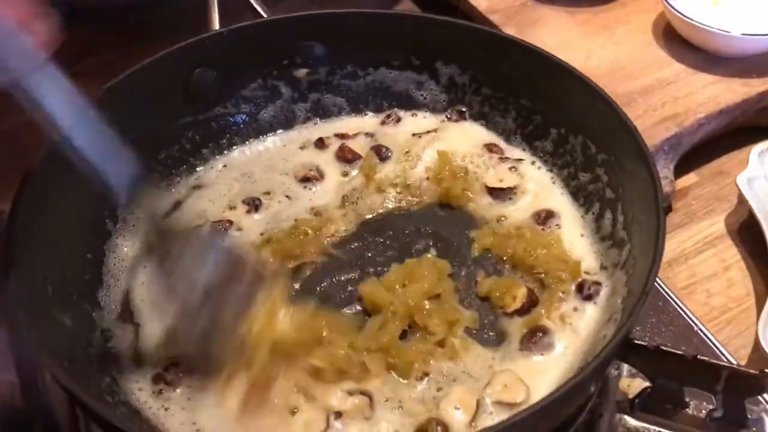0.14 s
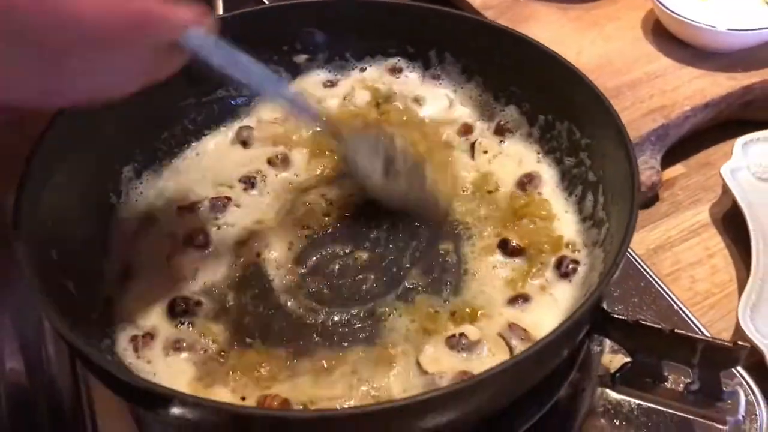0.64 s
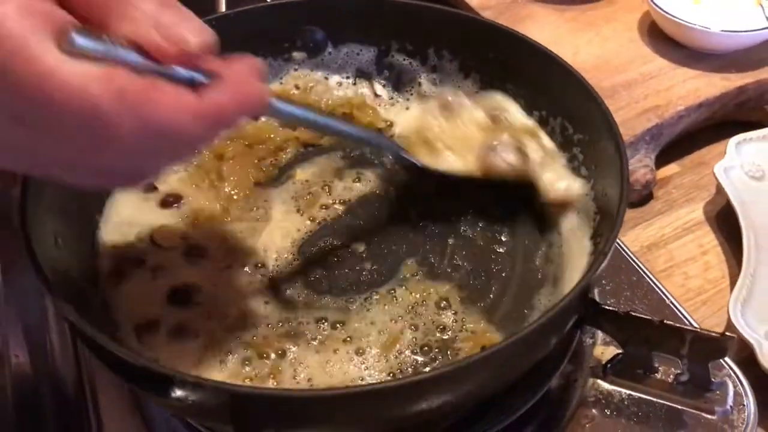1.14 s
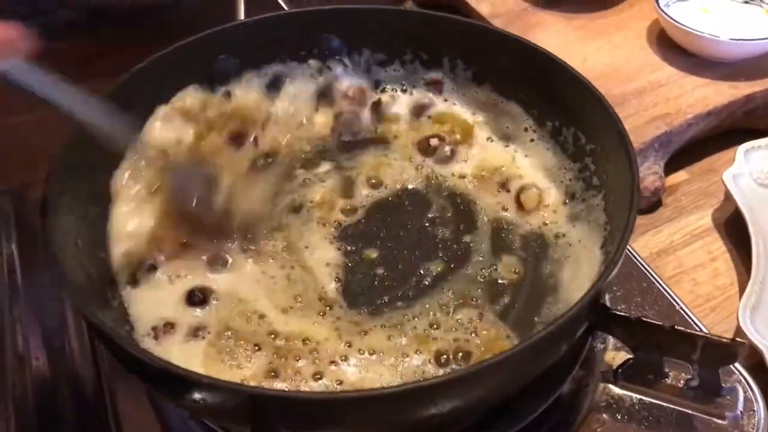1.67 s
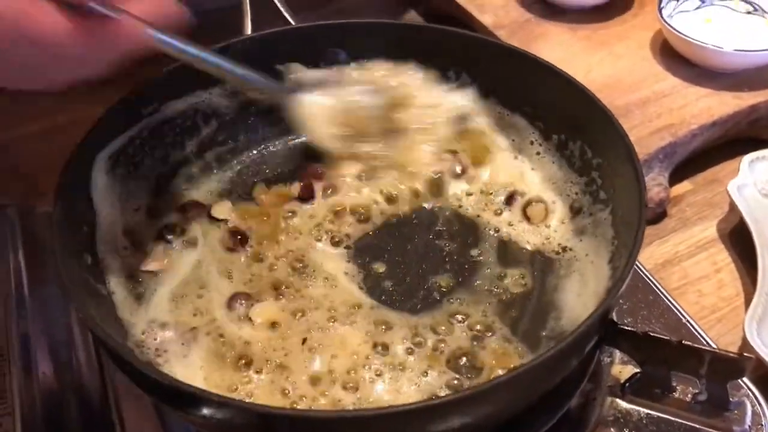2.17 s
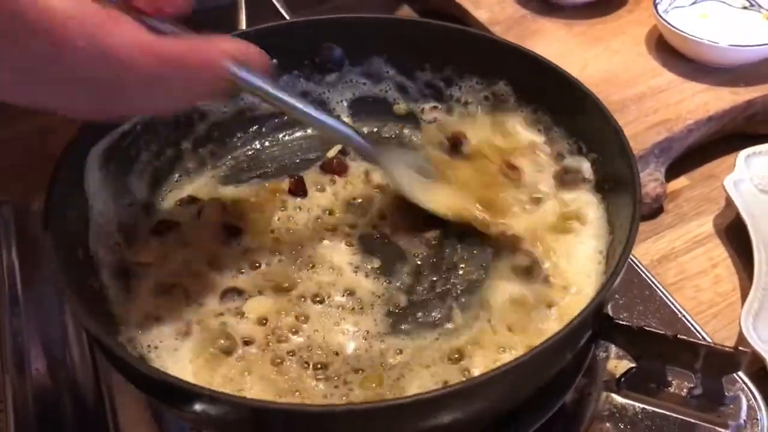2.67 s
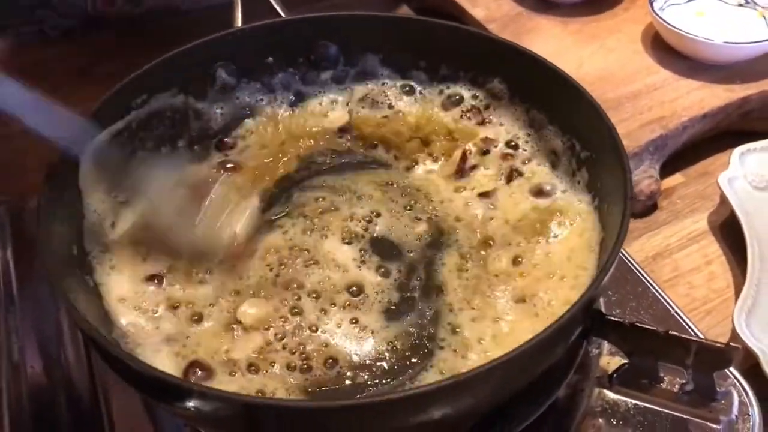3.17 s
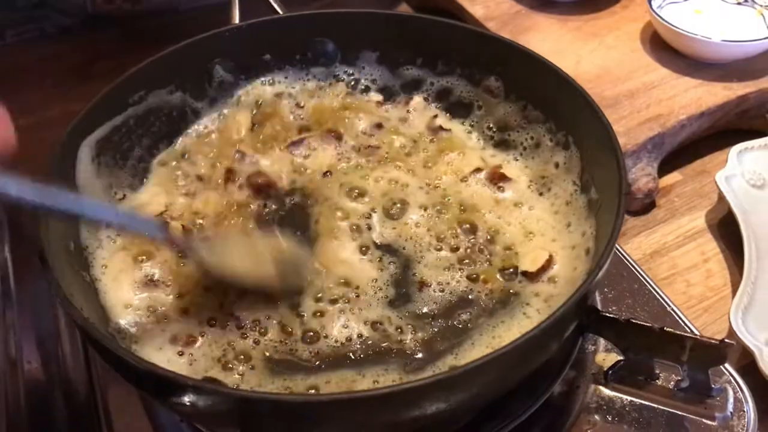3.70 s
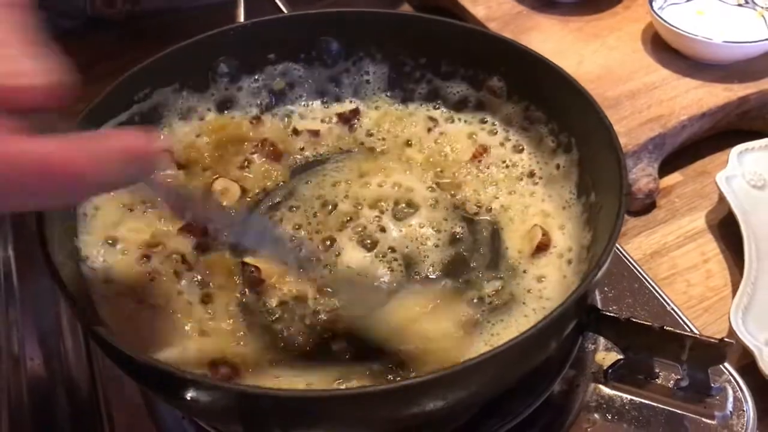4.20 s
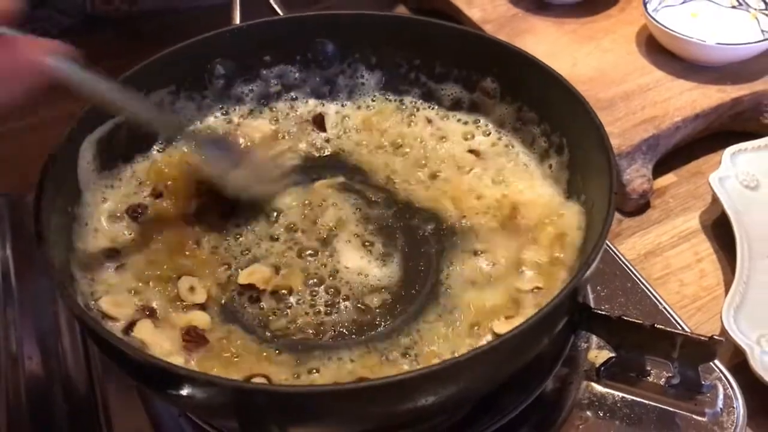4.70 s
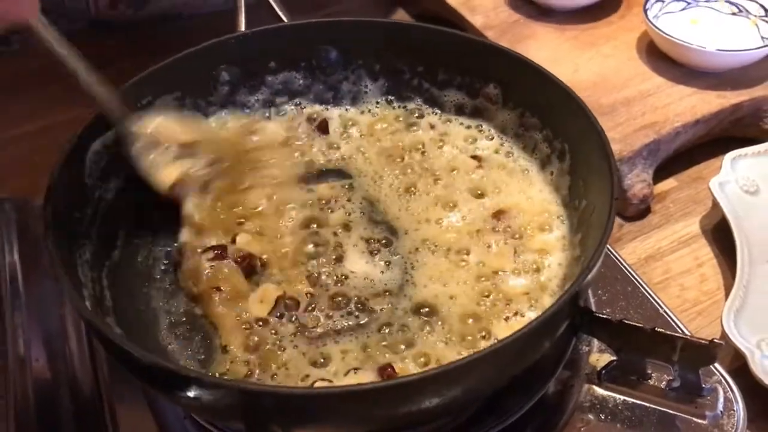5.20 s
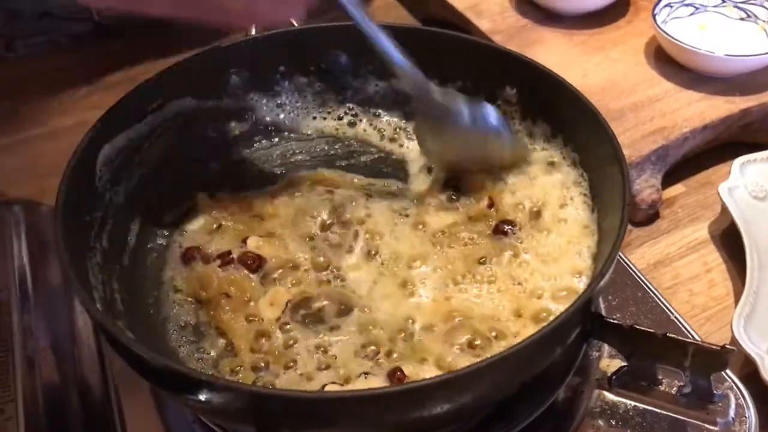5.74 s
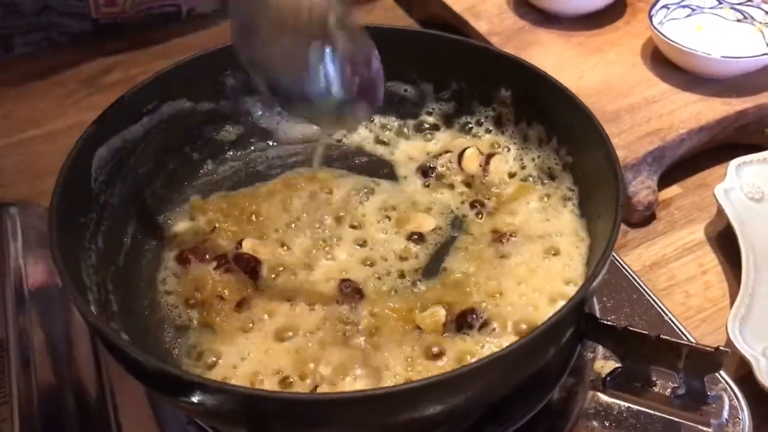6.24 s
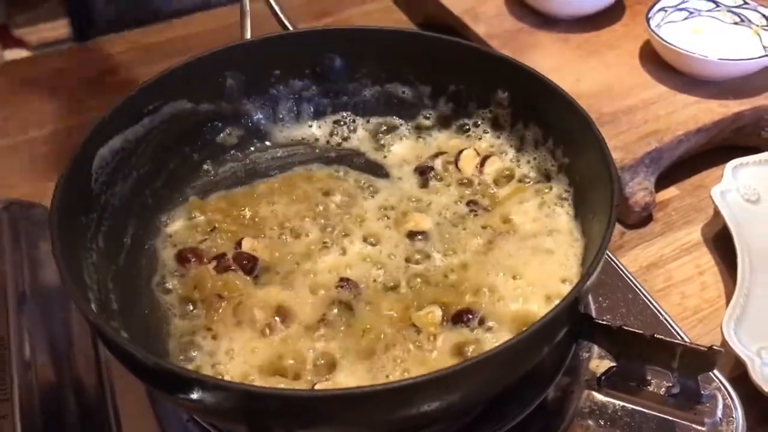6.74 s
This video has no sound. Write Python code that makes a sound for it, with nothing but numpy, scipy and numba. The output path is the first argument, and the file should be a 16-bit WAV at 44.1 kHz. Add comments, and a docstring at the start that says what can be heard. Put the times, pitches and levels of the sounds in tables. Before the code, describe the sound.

A metal spoon scrapes and knocks around a frying pan of fizzing, spitting butter, then stops, leaving the sizzle to weaken in a kitchen.

```python
"""A spoon drags, scrapes and knocks in a pan of foaming butter: friction grains and blows drive the pan's modes.
From the start bursting bubbles fizz as banded noise puffs over hiss; small bubbles ring; the pan rocks on the hob.
From 0.8 s louder spits, short rings with spray, join in; the deepest knock thuds at 5 s and stirring ends at 5.4 s.
After a last short scrape at 5.8 s the pan settles in soft low bumps at 6.4 s, and the fizz weakens.
Throughout: a low hum of shaped noise, a short room tail, and brief dropouts that keep only the strongest tones."""
import sys
import numpy as np
from scipy import signal
from scipy.fft import rfft, irfft
from scipy.io import wavfile
from scipy.ndimage import uniform_filter1d
from numba import njit

SR = 44100
rng = np.random.default_rng(int(sys.argv[2]) if len(sys.argv) > 2 else 0)


def attenuation_scalar(level_db):
    """Turn a level in dB into a linear amplitude multiplier (20 dB per decade)."""
    decades = np.asarray(level_db, float) / 20
    return 10 ** decades


def unload_audio(sound):
    """Save the sound as a 16-bit wav file, at the path given as the first command line argument."""
    columns = np.transpose(np.atleast_2d(sound))
    # keep every value between -1 and 1, then stretch to whole-number steps
    steps = np.round(np.clip(columns, -1, 1) * 32767)
    wavfile.write(sys.argv[1], SR, steps.astype(np.int16))


N = 302967


def rms_one(x):
    """Scales to rms 1."""
    return x / np.sqrt(np.mean(x ** 2) + 1e-20)


def in_time(rows):
    """Joins rows (time_s, values) by straight lines, one array a column."""
    time_s, *columns = np.transpose(rows)
    return [np.interp(np.arange(N) / SR, time_s, column) for column in columns]


def coloured(x, points):
    """Filters x by a spectrum (freq_hz, level_db), straight over log frequency."""
    hz, level_db = np.transpose(points)
    grid_hz = np.arange(N // 2 + 1) * SR / N + 1
    return irfft(rfft(x) * attenuation_scalar(np.interp(np.log(grid_hz), np.log(hz), level_db)), N)


def cut(x, hz, kind, order=4):
    """Butterworth high-, low- or band-pass."""
    return signal.sosfilt(signal.butter(order, hz, kind, fs=SR, output="sos"), x)


def drift(rate_hz):
    """Slow chance of rms 1, changing about rate_hz times a second; drawn at every 32nd sample."""
    r = np.exp(-64 * np.pi * rate_hz / SR)
    noise = rng.standard_normal(N // 32 + 2002)
    slow = signal.lfilter([1], [1, -2 * r, r * r], noise)[2000:]
    return np.interp(np.arange(N) / 32, np.arange(len(slow)), rms_one(slow))


def grains(per_s, spread_db):
    """Random clicks of either sign; most are small, a few large."""
    sizes = attenuation_scalar(spread_db * np.minimum(rng.exponential(1, N), 4.3)) * rng.choice([-1, 1], N)
    return sizes * (rng.random(N) < per_s / SR)


def ring(clicks, hz, t60_s):
    """A fixed two-pole resonance: a unit click starts a decaying sine of height 1."""
    r, turn = attenuation_scalar(-60 / (t60_s * SR)), 2 * np.pi * hz / SR
    return signal.lfilter([0, np.sin(turn)], [1, -2 * r * np.cos(turn), r * r], clicks + 1e-18)


@njit
def glide(x, turn, r):
    """A two-pole resonance of pole radius r whose centre (radians a sample) moves."""
    y = np.zeros(len(x))
    for i in range(2, len(x)):
        y[i] = x[i] - x[i - 2] + 2 * r * np.cos(turn[i]) * y[i - 1] - r * r * y[i - 2]
    return y


def strokes(rows, rest_db):
    """Summed level_db of domed strokes (start_s, length_s, level_db), and a blend of values by stroke power."""
    rise_db_per_s, fall_db_per_s, dome_db = 800, 334, 3.5   # slopes before and after; sag of the ends
    lift_s = 5.42   # stirring ends: no more resting contact
    t, fine = np.arange(0, N / SR + .002, .001), np.arange(N) / SR
    start, length, level_db = np.array(rows)[:, :3, None].transpose(1, 0, 2)
    along = np.clip((t - start) / np.maximum(length, .005), 0, 1)
    shape_db = -dome_db * (2 * along - 1) ** 2
    shape_db = shape_db - rise_db_per_s * np.maximum(start - t, 0)
    shape_db = shape_db - fall_db_per_s * np.maximum(t - start - length, 0)
    power = attenuation_scalar(2 * np.maximum(level_db + shape_db, -300))
    rest = attenuation_scalar(2 * rest_db) * (t < lift_s)
    total_db = 10 * np.log10(power.sum(axis=0) + rest + 1e-12)

    def blend(first, last):
        """Values run from first to last along each stroke."""
        values = first[:, None] * (1 - along) + last[:, None] * along
        return np.interp(fine, t, np.sum(power * values, axis=0) / power.sum(axis=0))

    return np.interp(fine, t, total_db), blend


# foam: time_s, level_db, bright_db (treble up, bass down)
FOAM_COURSE = [(0.0, -32.5, 8.5), (1.09, -29, 5.5), (1.2, -31, 4.5), (1.78, -32, 6), (2.2, -31, 3),
               (2.45, -31.5, 1), (3.27, -30, 6), (3.62, -32, 0.5), (4.21, -32.5, 4.5), (5.93, -34, 2.5),
               (6.39, -34, 1), (6.87, -37, 0.5)]
# fizz spectrum: freq_hz, density_db (per Hz)
FIZZ_SPECTRUM = [(260, -46), (450, -25.5), (654, -8.5), (794, -11.5), (882, -10.5), (993, -9), (1220, -11),
                 (1750, -6.5), (1920, -10), (2870, -7.5), (3810, -7), (4360, -6), (4910, -6), (8540, -4),
                 (16000, -11)]


def fizz():
    """Clumped bubble bursts, each a millisecond noise puff in neighbouring bands, over a smooth steam hiss."""
    bursts = np.abs(grains(2000 * attenuation_scalar(2.5 * drift(25)), 4.4))
    edges_hz, dealt = np.geomspace(600, 17000, 9), rng.integers(0, 8, N)
    crackle = 0
    for k, (low_hz, high_hz) in enumerate(zip(edges_hz, edges_hz[1:])):
        fade = np.exp(-np.sqrt(low_hz) / (.042 * SR))   # small bubbles die faster
        in_band = np.abs(dealt - k) < 1.5   # a burst spills into the next bands
        puffs = signal.lfilter([1], [1, -fade], bursts * in_band)
        crackle = crackle + cut(rms_one(puffs * rng.standard_normal(N)), [low_hz, high_hz], "band", order=1)
    hiss = rng.standard_normal(N) * attenuation_scalar(1.7 * drift(6.2))
    level_db, bright_db = in_time(FOAM_COURSE)
    foam = rms_one(coloured(rms_one(crackle) + attenuation_scalar(2.37) * hiss, FIZZ_SPECTRUM))
    low, top = cut(foam, 1130, "low", order=2), cut(foam, 8470, "high", order=2)
    # hotter foam tips the balance from large bubbles to small
    return attenuation_scalar(level_db) * (foam + (attenuation_scalar(-bright_db) - 1) * low + (attenuation_scalar(bright_db) - 1) * top)


# spits: start_s, level_db, pitch_hz
SPIT_BURSTS = [(0.803, -17, 3100), (0.9865, -17, 2880), (1.261, -19, 4020), (1.536, -12, 3530),
               (1.611, -18.5, 2940), (1.63, -28, 9000), (1.737, -8, 9700), (1.971, -14, 6000),
               (1.9789, 0, 11500), (1.981, -12, 5000), (2.273, -16.5, 3480), (2.363, -17, 5060),
               (2.4353, -2.5, 5270), (2.4804, -12, 9200), (2.6175, -10, 3720), (2.623, -17, 3500),
               (2.676, -12, 4000), (2.6771, -26, 3220), (2.7776, -13, 3050), (2.888, -11.5, 4020),
               (3.557, -32, 4000), (3.578, -19, 3000), (3.6737, -19, 4660), (3.7814, -14.5, 5360),
               (3.8363, -10.5, 4600), (3.918, -21, 3600), (4.318, -7, 4500), (4.363, -16, 4000),
               (4.6822, -18, 6630), (4.867, -8.5, 8500), (4.8956, -16, 4200), (4.959, -23, 3000),
               (4.983, -15.5, 2940), (4.9868, -18, 3030), (5.0055, -18, 2000), (5.2642, -9, 3500),
               (5.383, -20, 6460), (5.578, -18, 8000), (5.587, -17, 7000), (5.592, -21, 2300),
               (5.6094, -11, 9100), (5.617, -28, 6350), (5.639, -20, 9210), (5.662, -16, 9370),
               (5.785, -17, 4000), (5.883, -22, 4000), (5.902, -23, 2600), (5.922, -22, 6000),
               (6.053, -14, 4630), (6.055, -22, 3500), (6.09, -28, 5000), (6.1977, -8.5, 7200),
               (6.229, -19, 7450), (6.288, -17.5, 6140), (6.303, -7, 8900), (6.4513, -9.5, 8550),
               (6.684, -14, 5100), (6.7765, -15.5, 7800)]


def spits():
    """A big bubble bursts: a ring dying within a few cycles and a millisecond of spray."""
    out, t = np.zeros(N + 400), np.arange(400) / SR
    spray = rng.standard_normal((len(SPIT_BURSTS), 400))
    for (start_s, level_db, hz), noise in zip(SPIT_BURSTS, spray):
        pop = 1.38 * np.sin(2 * np.pi * hz * t) * np.exp(-t * hz)
        tail = cut(0.33 * noise * np.exp(-t / 0.0013), 0.17 * hz, "high", order=1)
        out[round(start_s * SR):][:400] += attenuation_scalar(level_db) * (pop + tail)
    return cut(out[:N], 640, "high", order=2)


def pops():
    """Scattered small bubbles ring a few cycles each, at pitches spread over two octaves."""
    pops_per_s, re_foam_db, t60_cycles = 190, -14.0, 9.1
    born = grains(pops_per_s * attenuation_scalar(3.0 * drift(8.0)), 2.5)
    dealt = rng.integers(0, 16, N)
    rings = 0
    for k, hz in enumerate(np.geomspace(2000, 8000, 16)):
        rings = rings + ring(born * (dealt == k), hz, t60_cycles / hz)
    return attenuation_scalar(in_time(FOAM_COURSE)[0] + re_foam_db) * rms_one(cut(rings, 1390, "high", order=4))


# spoon bowl on the pan floor: start_s, length_s, level_db, first_hz, last_hz (favoured pitch)
BOWL_DRAGS = [(0.0, 0.11, -25, 798, 883), (0.382, 0.11, -29, 980, 880), (0.515, 0.19, -28, 800, 940),
              (0.674, 0.12, -34.5, 880, 1060), (0.937, 0.16, -33.5, 810, 790), (1.114, 0.15, -42, 800, 940),
              (1.352, 0.026, -28, 880, 880), (1.439, 0.09, -27, 880, 947), (1.595, 0.025, -26.5, 920, 895),
              (1.895, 0.13, -38.5, 600, 655), (2.027, 0.16, -31, 706, 690), (2.176, 0.041, -39, 756, 880),
              (2.59, 0.052, -33.5, 910, 850), (2.71, 0.16, -34.5, 930, 950), (2.811, 0.051, -29, 960, 780),
              (2.928, 0.038, -26.5, 790, 734), (3.006, 0.17, -39, 1060, 1045),
              (3.144, 0.16, -35.5, 900, 856), (3.423, 0.089, -27.5, 750, 724),
              (3.584, 0.024, -39, 1010, 1030), (3.711, 0.058, -31.5, 900, 805),
              (3.944, 0.028, -27.5, 750, 880), (4.051, 0.078, -28.5, 1000, 840),
              (4.164, 0.082, -30, 1050, 880), (4.317, 0.039, -36.5, 1060, 1010),
              (4.34, 0.25, -35.5, 880, 850), (4.553, 0.077, -36, 880, 879), (4.606, 0.083, -34, 970, 1030),
              (4.717, 0.056, -36.5, 830, 840), (5.052, 0.043, -25, 635, 628), (5.142, 0.13, -33, 790, 770),
              (5.181, 0.068, -28, 683, 630), (5.306, 0.033, -25, 880, 935)]


def drags():
    """The dragging bowl: floor contact level_db and the shaking pitch_hz it favours."""
    rest_db, wander_share = -67, 0.026
    first_hz, last_hz = np.array(BOWL_DRAGS)[:, 3:].T
    floor_db, blend = strokes(BOWL_DRAGS, rest_db)
    return floor_db, blend(first_hz, last_hz) * (1 + wander_share * drift(46.0))


# spoon edge on the pan: start_s, length_s, wall_db, wall_hz (favoured), rim_db (re wall)
EDGE_SCRAPES = [(0.024, 0.093, -27.5, 2110, -2.5), (0.383, 0.086, -26.5, 2230, 1),
                (0.445, 0.048, -35, 1640, -12), (0.555, 0.19, -31.5, 1836, -6.5),
                (0.757, 0.036, -35, 2460, 9.5), (0.98, 0.087, -32.5, 1680, -20),
                (1.039, 0.06, -33, 1950, 6), (1.179, 0.023, -31.5, 1730, -4),
                (1.349, 0.026, -33.5, 1760, -21), (1.457, 0.062, -30.5, 1810, -6),
                (1.54, 0.046, -39, 1880, -12), (1.598, 0.02, -25, 1580, -24),
                (2.031, 0.072, -28.5, 1810, -11), (2.108, 0.094, -28, 1900, 1),
                (2.585, 0.056, -26, 1840, -4.5), (2.714, 0.11, -36, 1970, -2),
                (2.784, 0.044, -23.5, 1890, -8), (2.942, 0.067, -29, 2050, 2), (3.004, 0.02, -34, 1680, 1),
                (3.14, 0.11, -32, 1980, -1), (3.296, 0.11, -33.5, 2110, 0.5),
                (3.444, 0.042, -26.5, 1750, -4.5), (3.591, 0.017, -42.5, 2130, 6),
                (3.708, 0.091, -38, 1850, -12), (3.926, 0.011, -32, 2020, 3.5),
                (4.049, 0.018, -25.5, 2360, -5.5), (4.09, 0.02, -32, 1680, -12),
                (4.129, 0.021, -35, 1950, 3), (4.173, 0.08, -27.5, 2020, -4),
                (4.363, 0.018, -24.5, 2180, -3), (4.402, 0.063, -34, 1700, -4.5),
                (4.503, 0.03, -35.5, 1840, 1), (4.54, 0.08, -24.5, 1958, -6.5),
                (4.713, 0.059, -28, 1830, -1), (5.084, 0.12, -32, 1850, 2.5),
                (5.213, 0.11, -30, 2040, -1.5), (5.315, 0.03, -24, 2280, -7), (5.807, 0.015, -37, 2520, 0)]


def scrapes():
    """The scraping edge: wall and rim levels_db and favoured pitches_hz, which fall along a scrape and waver."""
    rest_wall_db, rest_rim_db = -76, -77
    sag_share, wander_share, rim_over_wall = 0.059, 0.062, 1.65
    middle_hz = np.array(EDGE_SCRAPES)[:, 3]
    wall_db, blend = strokes(EDGE_SCRAPES, rest_wall_db)
    wall_hz = blend(middle_hz * (1 + sag_share / 2), middle_hz * (1 - sag_share / 2))
    wall_hz = wall_hz * (1 + wander_share * drift(19.0))
    rim_rows = [(start_s, length_s, db + rim_db) for start_s, length_s, db, _, rim_db in EDGE_SCRAPES]
    rim_db, _ = strokes(rim_rows, rest_rim_db)
    return wall_db, wall_hz, rim_db, rim_over_wall * wall_hz


# pan rocking on the hob: start_s, length_s, level_db
HOB_ROCKS = [(0.0, 0.087, -40), (.38, 0.039, -49), (.97, 0.083, -49.5), (1.895, 0.036, -38.5),
             (2.16, 0.03, -41), (2.6, 0.043, -41.5), (2.94, .06, -50), (3.3, 0.17, -52), (3.44, 0.07, -39),
             (4.69, 0.041, -45), (5.028, 0.058, -36), (5.18, 0.034, -44.5), (5.3, 0.03, -33),
             (5.81, 0.016, -44), (6.39, 0.25, -55)]


def rocks():
    """Level_db of the pan rubbing on the hob as it rocks."""
    return strokes(HOB_ROCKS, -61.5)[0]


# spoon chatters down: delay_s (after the knock), share (of the blow)
REBOUNDS = [(.0017, 0.19), (.0062, 0.1), (.011, -.2)]
# knocks and rebounds: start_s, dull_db, floor_hz (favoured), bright_db,
# chatter (0-1, scales the mode strikes and the rebound ticks), thud_db
SPOON_KNOCKS = [(.969, -33, 900, -27, 0.7, -22), (1.638, -40, 625, -38, .5, -31),
                (1.8805, -20, 625, -24, 0.9, -20), (1.902, -32, 700, -31, 0.4, -21),
                (2.1563, -29, 1150, -15, 0.6, -10), (2.162, -25, 880, -36, 0.5, -20),
                (2.5855, -31.5, 920, -19, 0.76, -20), (2.936, -29, 850, -21, 0.64, -28),
                (4.044, -46, 1060, -36, .6, -25.5), (5.0165, -13.5, 630, -15, 0.5, -5.5),
                (5.298, -36, 1000, -6.5, 0.97, -21), (5.3017, -24, 880, -18, 0.56, -12.5),
                (5.3073, -26, 786, -17, 0.66, -16)]
KNOCK_S, DULL_DB, KNOCK_HZ, BRIGHT_DB, CHATTER, THUD_DB = np.transpose(SPOON_KNOCKS)
KNOCK_AT = np.round(KNOCK_S * SR).astype(int)


def strikes(k, share_db):
    """Clicks that strike mode k: each knock and its rebounds, with a chance level per knock."""
    blow = attenuation_scalar(share_db + 2.5 * rng.standard_normal(len(KNOCK_AT)))
    out = np.zeros(N)
    for delay_s, share in [(0.00068, 1)] + REBOUNDS:
        # neighbouring modes start in opposite sense
        out[KNOCK_AT + round(delay_s * SR)] = share * CHATTER * blow * (-1) ** k
    return out


def thuds():
    """The pan floor under the spoon gives a damped thud, 60 dB down after 11 cycles."""
    out, click = np.zeros(N), np.arange(2000) == 0
    for i, hz, thud_db in zip(KNOCK_AT, KNOCK_HZ, THUD_DB):
        out[i:i + 2000] += ring(attenuation_scalar(thud_db) * click, hz, 11 / hz)
    return out


def ticks():
    """The sharp contact of each knock: a click and a noise burst decaying in 2.5 ms."""
    tick = np.zeros(N)
    tick[KNOCK_AT] = attenuation_scalar(BRIGHT_DB + 3.5)
    for delay_s, share in REBOUNDS:
        tick[KNOCK_AT + round(delay_s * SR)] = np.abs(share) * CHATTER * tick[KNOCK_AT]
    burst = signal.lfilter([1], [1, -np.exp(-1 / (0.0025 * SR))], tick) * rng.standard_normal(N)
    return cut(burst + 1.7 * tick, [1500, 7500], "band", order=2)


# pan modes: freq_hz, level_db, t60_s
PAN_MODES = [(155.5, 4, 0.079), (193.4, -8, 0.2), (245, 3, 0.018), (396, -17, 0.035), (544, -5, 0.13),
             (580, 2, 0.16), (616, 3, 0.084), (810.6, 1, 0.11), (880, -9.5, 0.26), (996, -1, 0.2),
             (1060, 2, 0.071), (1206, 6, 0.029), (1667, -6.5, 0.18), (1733, -1.5, 0.04), (1966, -22, 0.023),
             (1947, -4.5, 0.04), (2110, -3, 0.038), (2245, 0, 0.041), (2353, 2.5, 0.026),
             (2750, -2.5, 0.027), (2966, 0, 0.043), (3188, -5.5, 0.015), (3480, -8, 0.041),
             (3667, -4, 0.019), (4275, -1, 0.019), (4630, -3.5, 0.028), (5200, -2, 0.019),
             (5370, -15.5, 0.012), (5870, 5, 0.0039)]


def spoon():
    """Friction grains and knocks drive each mode; where the spoon bears decides which modes it favours."""
    floor_from_hz, wall_from_hz, rim_from_hz = 400, 1400, 2600
    mode_bend_share = 0.015
    floor_db, floor_hz = drags()
    wall_db, wall_hz, rim_db, rim_hz = scrapes()
    rock_db = rocks()
    grit = rms_one(grains(4000, 3.0)) * attenuation_scalar(1.7 * drift(65))   # the edge sticks and slips
    pressure = drift(5.0)
    pan, rocking, blows = np.zeros((3, N))
    for k, (hz, level_db, t60_s) in enumerate(PAN_MODES):
        if hz < floor_from_hz:
            rub_db = rock_db - 10.5
            share_db = DULL_DB - 18.0
        elif hz < wall_from_hz:
            rub_db = floor_db - 8.5 - 42 * np.abs(np.log2(hz / floor_hz))
            share_db = DULL_DB + 3.5 - 16 * np.abs(np.log2(hz / KNOCK_HZ))
        elif hz < rim_from_hz:
            rub_db = wall_db - 8.5 - 18 * np.abs(np.log2(hz / wall_hz))
            share_db = BRIGHT_DB - 6.5
        else:
            rub_db = rim_db - 7.5 - 14 * np.abs(np.log2(hz / rim_hz))
            share_db = BRIGHT_DB - 10.0
        # each mode above the rocking ones comes and goes along a stroke
        wander = attenuation_scalar(3.22 * drift(11.2) * (hz > floor_from_hz))
        strike = strikes(k, share_db)
        # the spoon stays pressed down and damps most of the ring early; a little rings on freely
        damped = attenuation_scalar(level_db) * ring(strike, hz, 0.49 * t60_s)
        force = grit * wander * attenuation_scalar(rub_db) * np.sqrt(28 / (t60_s * SR)) + 0.066 * strike
        # pressing on the pan detunes it, each mode at its own delay
        turn = 2 * np.pi * hz / SR * (1 + mode_bend_share * np.roll(pressure, k * 9000))
        free = attenuation_scalar(level_db) * glide(force, turn, attenuation_scalar(-60 / (t60_s * SR))) / 2
        if hz < floor_from_hz:
            rocking += damped + free
        else:
            blows += damped
            pan += free
    # the gap between spoon bowl and pan adds resonances that slide with the stroke
    gaps = (floor_hz, 120, floor_db - 10.5), (wall_hz, 240, wall_db - 9.5), (rim_hz, 400, rim_db - 16.5)
    for hz, width_hz, level_db in gaps:
        turn, r = 2 * np.pi * hz / SR, np.exp(-np.pi * width_hz / SR)
        pan += attenuation_scalar(level_db) * rms_one(glide(glide(grit, turn, r), turn, r))
    # crumbs crunch under the edge
    pan += attenuation_scalar(rim_db - 12.5) * rms_one(cut(grains(970, 3.6), [3000, 5600], "band", order=2))
    # the hob rumbles along
    rocking += attenuation_scalar(rock_db - 11.0) * rms_one(cut(grit, [90, 250], "band", order=2))
    # a small pan radiates little below its lowest modes, and is silent between two of them
    null_hz, null_width_hz = 701, 49
    body = cut(pan, 617, "high", order=6)
    body = signal.lfilter(*signal.iirnotch(null_hz, null_hz / null_width_hz, SR), body)
    knocked = cut(blows + thuds(), 355, "high", order=3)
    return body + knocked + cut(rocking, [75, 300], "band", order=2) + ticks()


# pan settling softly on the hob: centre_s, level_db, pitch_hz, length_s
SETTLING = [(6.408, -48, 151, .03), (6.44, -41.5, 155, 0.032), (6.519, -47.5, 269, 0.074),
            (6.52, -44, 153, .04)]


def bumps():
    """Each soft bump is a low tone that swells and dies."""
    t, out = np.arange(N) / SR, np.zeros(N)
    for centre_s, level_db, hz, length_s in SETTLING:
        swell = np.cos(np.pi * np.clip((t - centre_s) / length_s, -.5, .5)) ** 2
        out += attenuation_scalar(level_db) * swell * np.sin(2 * np.pi * hz * t)
    return out


def kitchen(x):
    """A short dull tail from hard walls close by: decaying noise, t60 91 ms, convolved with x."""
    t = np.arange(SR // 3) / SR
    tail = rng.standard_normal(len(t)) * attenuation_scalar(-60 * t / 0.091) * (t > .004)
    tail = signal.lfilter([1], [1, -.5], tail)
    return signal.fftconvolve(x, tail / np.sqrt(np.sum(tail ** 2)))[:N]


# hum spectrum: freq_hz, density_db (per Hz)
HUM_SPECTRUM = [(15, -48), (25, -19), (49, -5.5), (70, -6), (102, 1), (129, -20), (188, -8.5), (316, -14),
                (355, -15), (560, -26), (730, -23), (1230, -120)]


def hum():
    """Low kitchen hum: noise shaped to a low spectrum."""
    return attenuation_scalar(-57) * rms_one(coloured(rng.standard_normal(N), HUM_SPECTRUM))


def scene():
    """One microphone feeds both channels."""
    pan = spoon() + spits() + bumps() + pops()
    return np.tile(pan + attenuation_scalar(-18) * kitchen(pan) + fizz() + hum(), (2, 1))


# dropouts: centre_s, depth_db, length_s (before the fades widen it)
DROPOUT_MOMENTS = [(0.192, -14, 0.014), (0.255, -16, 0.017), (0.714, -38, 0.025), (1.705, -15, 0.015),
                   (2.857, -14, 0.012), (2.92, -14, 0.013), (3.219, -15, 0.017), (3.498, -15, 0.017),
                   (3.628, -12, 0.018), (3.692, -13, 0.015), (4.331, -17, 0.02), (4.586, -9, 0.012),
                   (4.629, -12, 0.016), (4.778, -14, 0.011), (5.483, -15, 0.015), (5.866, -14, 0.012),
                   (6.014, -14, 0.016), (6.179, -31, 0.027), (6.275, -22, 0.013), (6.528, -35, 0.042)]


def drop_out(x):
    """For a moment all sinks except the few tones that are loudest or stand highest over their neighbours."""
    out = x.copy()
    for centre_s, depth_db, length_s in DROPOUT_MOMENTS:
        half = round((length_s / 2 + 0.009) * SR)
        span = slice(round(centre_s * SR) - half, round(centre_s * SR) + half)
        spectrum = rfft(x[span] * signal.windows.tukey(2 * half, .5))
        power = np.abs(spectrum) ** 2
        stands = power > 4.0 * uniform_filter1d(power, size=61, mode="constant")
        stands = stands | (power > 9 * power.mean())
        near_peak = uniform_filter1d(stands * 1., size=3) > 0
        tones = attenuation_scalar(5.0) * irfft(spectrum * near_peak, 2 * half)
        away_s = np.abs(np.arange(-half, half)) / SR
        fade = np.clip((length_s / 2 + 0.0091 - away_s) / 0.011, 0, 1)
        kept = 1 - (1 - attenuation_scalar(depth_db)) * np.sin(np.pi / 2 * fade) ** 2
        out[span] = kept * x[span] + (1 - kept) * tones
    return out


def top_cut(x):
    """Nothing passes above the cut-off."""
    return signal.sosfilt(signal.butter(12, 17090, fs=SR, output="sos"), x)


# microphone housing dips: centre_hz, width_hz, share (of the band removed)
HOUSING_DIPS = [(7880, 670, 0.22), (10340, 1600, 0.4)]


def record(dry):
    """Rounded peaks, two dips of the microphone housing, brief dropouts, then the top cut."""
    x = 1.2 * np.tanh(dry[0] / 1.2)
    for hz, width_hz, share in HOUSING_DIPS:
        x = x - share * signal.lfilter(*signal.iirpeak(hz, hz / width_hz, SR), x)
    low_pass = signal.cheby2(20, 80, 16080, fs=SR, output="sos")   # order, stop_db, stop_hz
    cut_top = signal.sosfilt(low_pass, drop_out(x))
    return top_cut(np.tile(cut_top, (2, 1)))


dry = scene()
out = record(dry)
unload_audio(out)
```